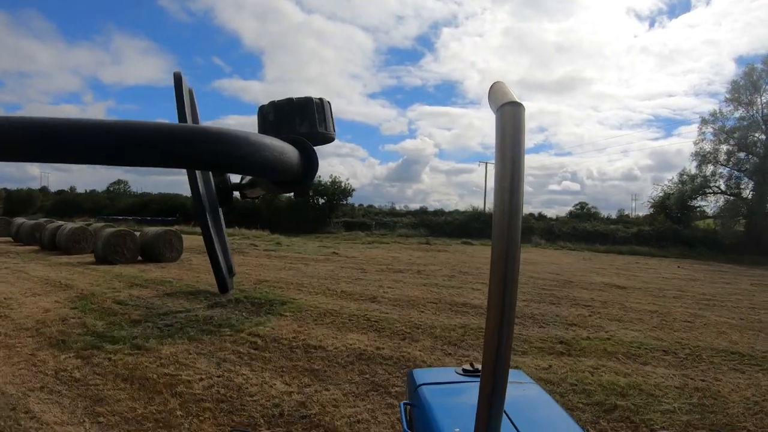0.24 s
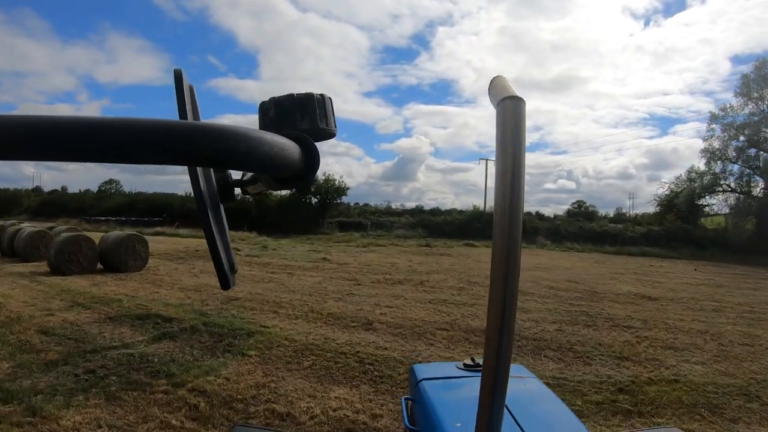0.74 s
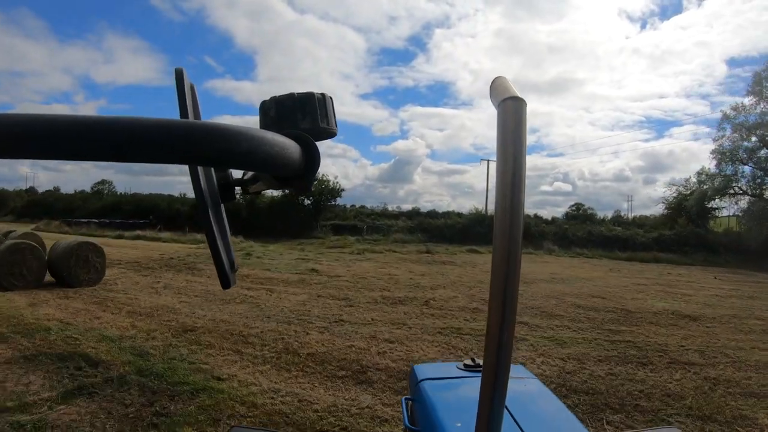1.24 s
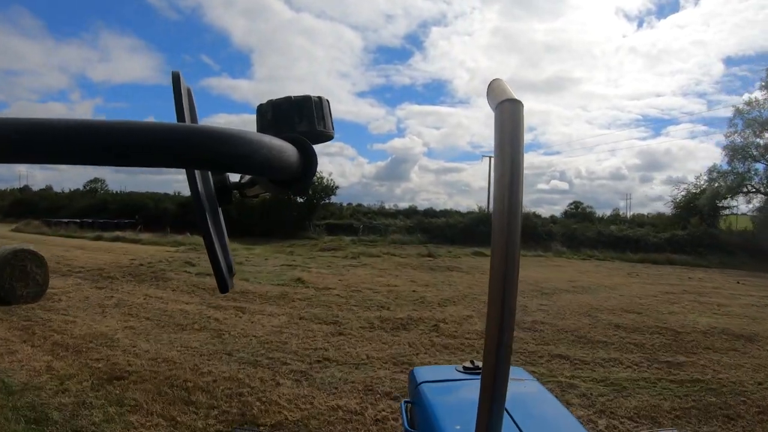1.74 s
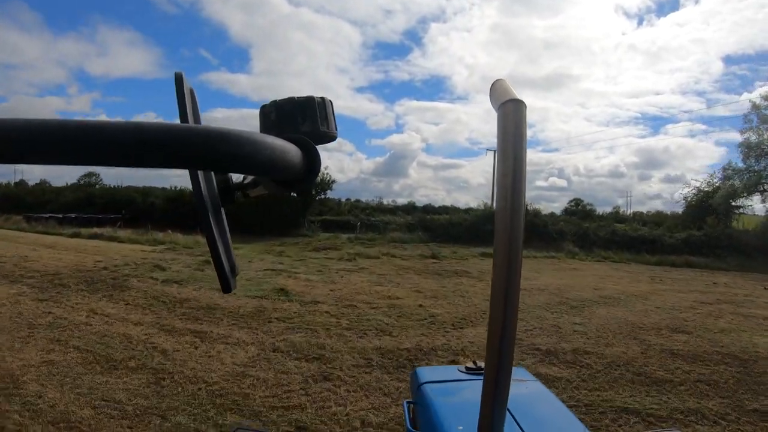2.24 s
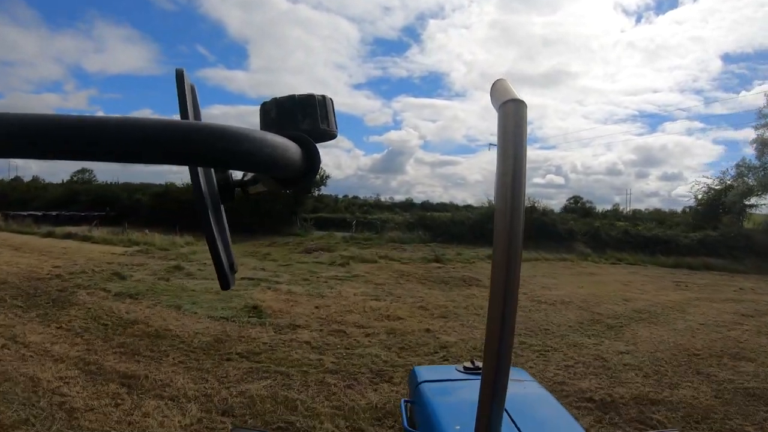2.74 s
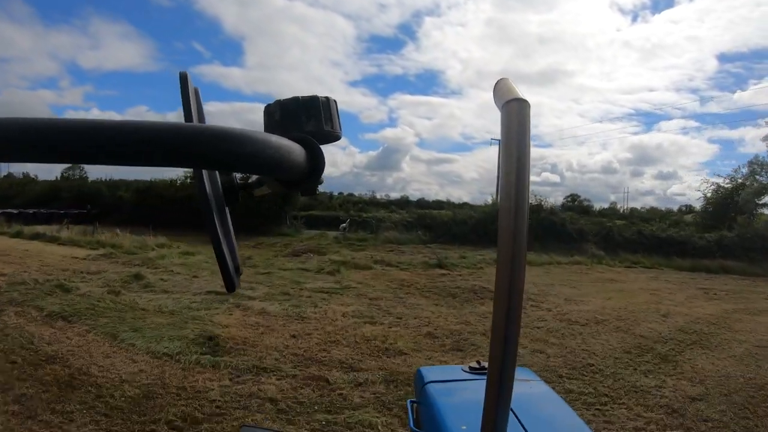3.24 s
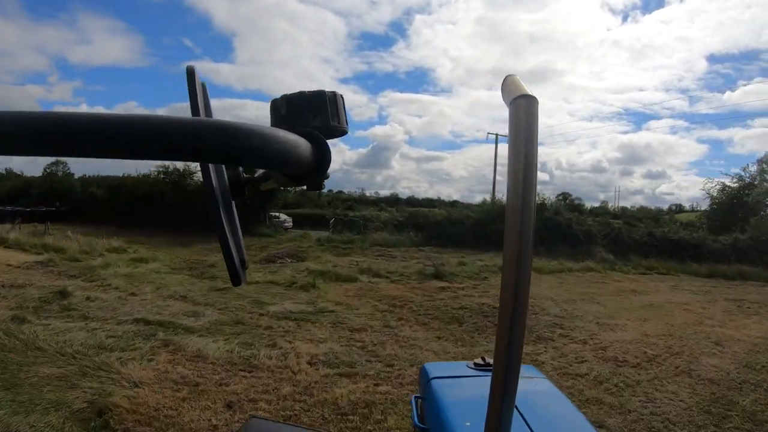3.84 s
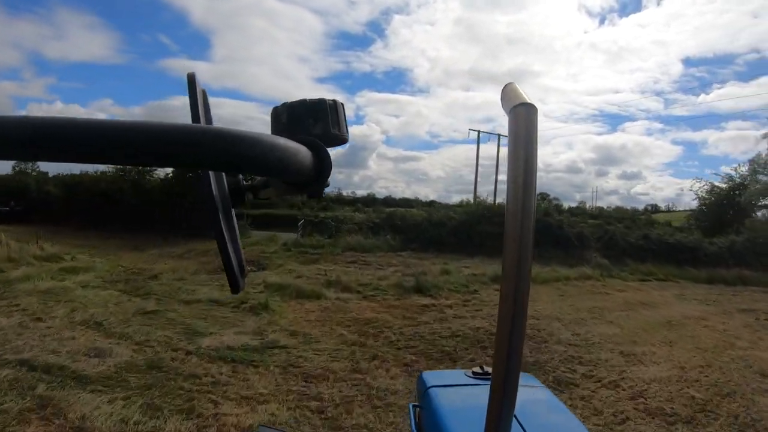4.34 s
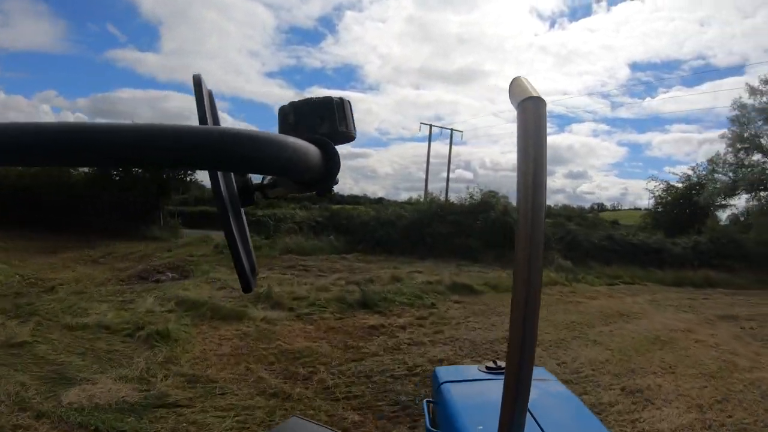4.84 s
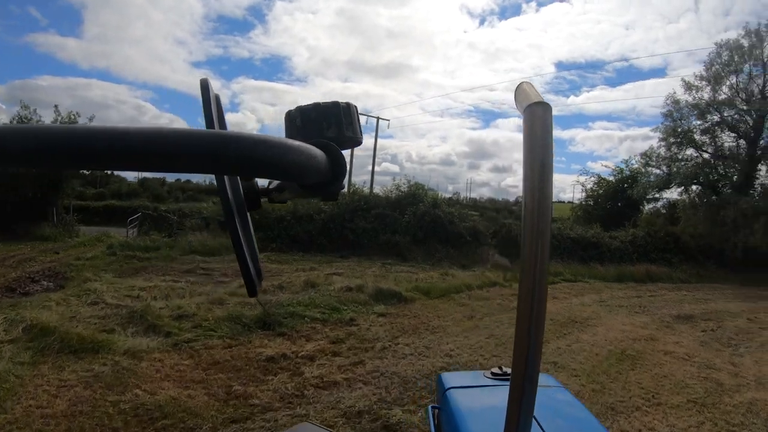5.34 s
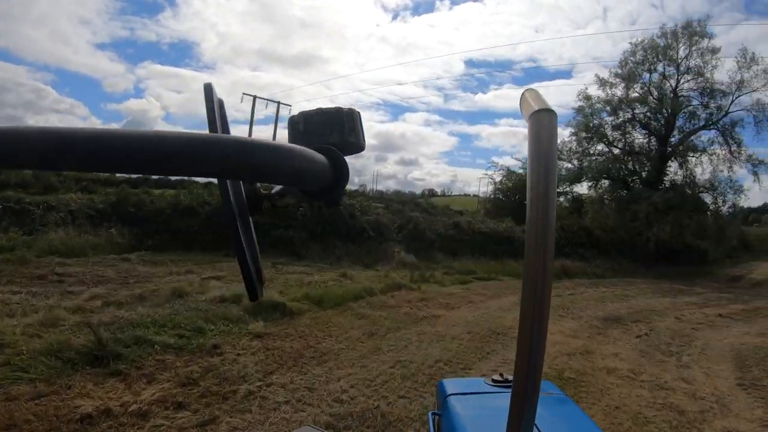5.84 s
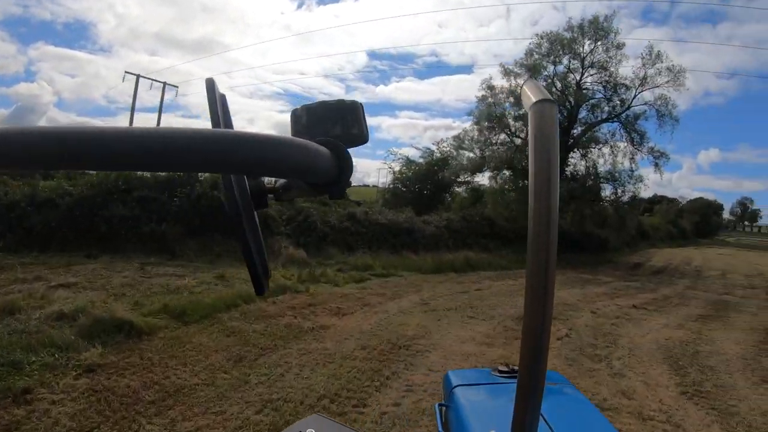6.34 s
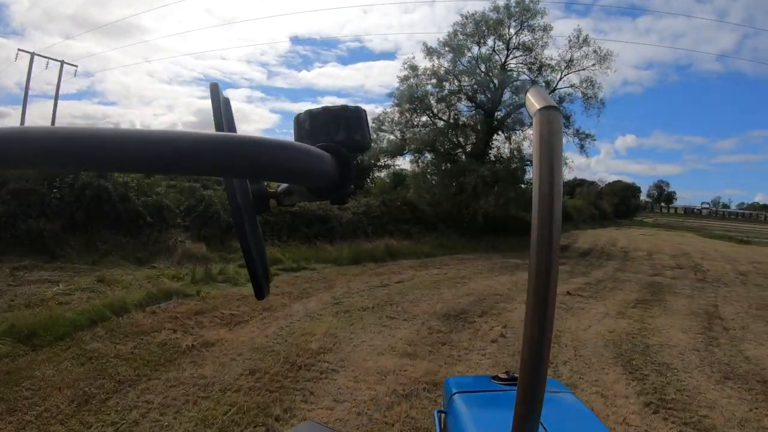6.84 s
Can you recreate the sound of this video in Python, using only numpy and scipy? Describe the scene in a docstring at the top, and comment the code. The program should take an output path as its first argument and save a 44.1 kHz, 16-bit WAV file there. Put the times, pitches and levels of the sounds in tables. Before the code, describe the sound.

A six-cylinder diesel tractor drones loudly in a field, heard from the seat just behind its upright exhaust. The sound starts wide, with a bright hiss on the right, then closes to muffled mono after about 0.7 seconds. The deep exhaust note carries a hollow boom, fast engine knock, faint gear hiss and chassis rumble. Loose fittings clack irregularly on bumps throughout, most clearly around 2.5 seconds, and panels sing faintly between 1 and 2 seconds. The pitch sags slowly under load, dipping more noticeably around 4.3 seconds. At 5.5 seconds the throttle shuts: the drone gets quieter and falls in pitch, breaking into dull chugs over the rumble. A low thud lands near 6.7 seconds, the engine is blipped briefly at 6.8 with harder knocking and rattles, and two more dull thuds follow just after 7 seconds.

```python
"""In a field, on the seat of a six-cylinder diesel tractor, just behind its upright exhaust stack.
The stack drones on the firing rate and its octave; each firing booms in the silencer, puffs from the
pipe and knocks on the block. Gears hiss, the chassis rumbles, fittings clack on bumps, panels sing.
The engine lugs, runs down from 5.5 s with the throttle shut, and is blipped at 6.8 s amid dull thuds.
The sound starts wide, with a bright hiss on the right, then closes to a muffled mono after 0.7 s."""
import sys
import numpy as np
from scipy import signal
from scipy.fft import rfft, irfft
from scipy.io import wavfile

SR = 44100
rng = np.random.default_rng(int(sys.argv[2]) if len(sys.argv) > 2 else 0)


def put_to_file(sound):
    """Save the sound as 16-bit audio at rate SR, in the file named by the first command-line argument."""
    columns = np.atleast_2d(sound).T  # one column per channel
    safe = np.clip(columns, -1, 1)
    whole_steps = np.round(safe * 32767)
    wavfile.write(sys.argv[1], SR, whole_steps.astype(np.int16))


N = 312360
TIME = np.arange(N) / SR
BIN_HZ = np.maximum(np.fft.rfftfreq(N, 1 / SR), 1)
SHUT_AT_S, RUN_DOWN_S = 5.485, 1.0


def from_db(db):
    """Decibels to gain."""
    return 10 ** (np.asarray(db) / 20)


def unit_rms(x):
    """Scale to rms 1."""
    return x / np.sqrt(np.mean(x ** 2) + 1e-20)


def curves(rows):
    """Each column of a timed table, at every sample."""
    times_s, *columns = np.transpose(rows)
    return [np.interp(TIME, times_s, column) for column in columns]


def ramp(start_s, length_s):
    """Linear rise, 0 to 1."""
    return np.clip((TIME - start_s) / length_s, 0, 1)


def drift(rate_hz):
    """Smooth random wander, spread 1."""
    slow = np.convolve(rng.standard_normal(4000), np.hanning(9), "valid")
    return np.interp(TIME * rate_hz * 4, np.arange(len(slow)), unit_rms(slow))


def coloured(x, spectrum):
    """Shape by a spectrum, falling 48 dB per octave past its ends; rms 1."""
    hz, db = np.transpose(spectrum)
    octaves_out = np.abs(np.log2(BIN_HZ / np.clip(BIN_HZ, hz[0], hz[-1])))
    gain = from_db(np.interp(np.log(BIN_HZ), np.log(hz), db) - 48 * octaves_out)
    return unit_rms(irfft(rfft(x) * gain, N))


def resonate(x, modes):
    """Parallel resonances of alternating sign."""
    out = 0
    for k, (hz, width_hz, db) in enumerate(modes):
        radius = np.exp(-np.pi * width_hz / SR)
        forward = np.array([1, 0, -1]) * (1 - radius ** 2) / 2
        feedback = [1, -2 * radius * np.cos(2 * np.pi * hz / SR), radius ** 2]
        out += (-1) ** k * from_db(db) * signal.lfilter(forward, feedback, x + 1e-18)
    return out


def butter(x, hz, kind, order=2):
    """Butterworth filter."""
    return signal.sosfilt(signal.butter(order, hz, kind, fs=SR, output="sos"), x)


def chatter(crank, repeat, steps=2400):
    """Fine impacts; the share `repeat` recurs at the same crank angles every six firings."""
    step = np.floor(crank / 6 * steps).astype(int)
    recurring = rng.standard_normal(steps)[step % steps] * (np.diff(step, prepend=step[0]) > 0)
    return np.sqrt(repeat) * unit_rms(recurring) + np.sqrt(1 - repeat) * rng.standard_normal(N)


def throb(crank, depth_db, lag):
    """One swell per firing, `lag` firings late."""
    return from_db(depth_db * np.cos(2 * np.pi * (crank - lag)))


def blip(lag_s=0, at_s=6.8, attack_s=.06, hold_s=.105, release_s=.085):
    """Short push on the throttle, 0 to 1."""
    start_s = at_s + lag_s
    return ramp(start_s, attack_s) - ramp(start_s + attack_s + hold_s, release_s)


# Engine speed under load (time [s], firing rate [Hz])
PULLING_SPEED = [(0, 98.92), (0.3, 98.95), (0.8, 98.39), (1.2, 97.93), (1.5, 96.79), (1.9, 96.73),
                 (2.1, 93.51), (2.33, 95.51), (2.62, 93.56), (2.8, 94.2), (3.97, 93.72), (4.25, 91.5),
                 (4.42, 85.59), (4.6, 86.74), (4.8, 86.17), (5.25, 83.05), (5.5, 81.81)]

def firing_rate_hz(slows_at_s=5.53, idle_hz=22, blip_adds_hz=21.73):
    """The engine pulls, runs down towards idle with the fuel cut, then gains from the blip."""
    pulling_hz, = curves(PULLING_SPEED)
    momentum = np.exp(-np.maximum(TIME - slows_at_s, 0) / RUN_DOWN_S)
    return idle_hz + (pulling_hz - idle_hz) * momentum + blip_adds_hz * np.cumsum(blip()) / blip().sum()


def lugging_hz():
    """Firing rate lost to the load."""
    pulling_hz, = curves(PULLING_SPEED)
    return pulling_hz.max() - pulling_hz


# Throttle response, part: (pulling [dB], just shut [dB], coasting fade [dB/s], blip [dB])
THROTTLE_RESPONSE = {"chugs": (-50, -27.5, 3, -27), "boom": (-2.5, -30, 1.5, -24),
                     "ring": (-7, -51, -7.5, -38), "knock": (2, -29.5, 0.5, -20),
                     "gears": (-46, -46, 1.1, -38.5), "whir": (-55.5, -46.5, 6, -43),
                     "chassis": (-28.5, -26.5, -4, -19), "flutter": (-24.5, -23.5, 5.5, -36)}
# Late response, part: (lag [s])
THROTTLE_LAG_S = {"boom": .025, "gears": .005, "whir": .02, "chassis": .03, "flutter": .03}

def part_db(part, effort_db=0, shut_takes_s=.11):
    """Level of one part as the throttle is held, shut and blipped."""
    pulling_db, shut_db, fade_db_per_s, blip_db = THROTTLE_RESPONSE[part]
    lag_s = THROTTLE_LAG_S.get(part, 0)
    coast_db = shut_db - fade_db_per_s * np.maximum(TIME - SHUT_AT_S, 0)
    shut, push = ramp(SHUT_AT_S + lag_s, shut_takes_s), blip(lag_s)
    db = (1 - shut) * (pulling_db + effort_db) + shut * coast_db
    return (1 - push) * db + push * blip_db


def wide_share(hold_s=.71, fade_db_per_s=45.5):
    """Share of the wide, bright sound, 1 to 0."""
    return from_db(-fade_db_per_s * np.maximum(TIME - hold_s, 0))


# Exhaust note while coasting (time [s], firing tone [dB], octave [dB])
COASTING_NOTE = [(5.53, -14, -9), (5.555, -23, -36), (5.595, -13, -24), (5.645, -32, -30), (5.69, -19, -23),
                 (5.8, -23, -25), (5.87, -25.5, -25), (6.15, -31.5, -37), (6.35, -36, -46),
                 (6.52, -31, -29.5), (6.75, -35, -36)]

def note_db(tone_db=-15.5, octave_db=-14.5, blip_tone_db=-14.5, blip_octave_db=-24.5):
    """Levels of firing tone and octave: pulling, coasting, blipped."""
    pulling = tone_db - .9 * wide_share(), octave_db - .1269 * lugging_hz()
    shut, push = ramp(COASTING_NOTE[0][0], .02), blip(lag_s=.038)
    states = zip(pulling, curves(COASTING_NOTE), (blip_tone_db, blip_octave_db))
    return [(1 - push) * ((1 - shut) * pull_db + shut * coast_db) + push * blip_db
            for pull_db, coast_db, blip_db in states]


# Weak exhaust lines (order [x cycle rate], level re boom [dB], change with lugging [dB/Hz])
UNEVEN_ORDERS = [(10, -5.5, .1), (14, -.5, .4), (16, -10, -.1), (18, -1.5, -1.8), (20, -.5, -.6),
                 (22, -13, .6), (24, -13, -.1), (26, -9.5, -.7), (28, -7.5, -.4)]

def drone(crank, boom_db, loaded_db=-17, octave_lag_rad=1.8):
    """The stack's note: firing tone, octave and the weak lines of unequal cylinders."""
    tone_db, octave_db = note_db()
    phase = 2 * np.pi * crank
    out = from_db(tone_db + .1 * drift(6.2)) * np.cos(phase)
    out += from_db(octave_db + .5 * drift(20)) * np.cos(2 * phase - octave_lag_rad)
    lines_db = boom_db + np.minimum(octave_db - loaded_db, 0)  # they die when the fuel is cut
    for order, db, lug_db_per_hz in UNEVEN_ORDERS:
        gain = from_db(lines_db + db + lug_db_per_hz * lugging_hz() + .43 * drift(1))
        out += gain * np.cos(order * phase / 6 + 2 * np.pi * rng.random() + .34 * drift(3.2))
    return np.sqrt(2) * out


# Chassis shake (frequency [Hz], relative density [dB])
CHASSIS_SPECTRUM = [(15, -23.5), (30, -4), (50, 1.5), (85, 3), (130, -3), (200, -2.5), (250, -4), (350, -9),
                    (600, -35)]
# Exhaust flutter (frequency [Hz], relative density [dB])
FLUTTER_SPECTRUM = [(56, -17.5), (85, -6.5), (130, -0.5), (200, -6), (240, -6.5), (290, -38)]

def rumble(stubble_db=-7.5):
    """The chassis shakes and the exhaust flutters, more as smooth stubble gives way to rough grass."""
    ground_db = stubble_db * (1 - ramp(start_s=.43, length_s=1.5))
    chassis_db = part_db("chassis", ground_db) + 1.9 * drift(6)
    chassis = from_db(chassis_db) * coloured(rng.standard_normal(N), CHASSIS_SPECTRUM)
    flutter = from_db(part_db("flutter", ground_db)) * coloured(rng.standard_normal(N), FLUTTER_SPECTRUM)
    return chassis + flutter


# Stack pipe response (frequency [Hz], relative gain [dB])
PIPE_SPECTRUM = [(600, -20), (650, -14), (672, -2), (703, 2), (738, 0), (765, -8), (850, -20), (950, -24),
                 (1045, -22), (1078, -6.5), (1110, -20), (1148, -14), (1174, -2), (1200, -14), (1225, -13),
                 (1320, -30)]

def bark(crank, rate_hz, lag_firings=2.35, even_db=-5, rings_on_hz=1000):
    """The strongest cylinder rings the stack once a cycle; its opposite answers more weakly."""
    hz, db = np.transpose(PIPE_SPECTRUM)
    phase = 2 * np.pi * (crank - lag_firings + .006 * drift(12)) / 6
    out = 0
    for order in range(38, 92):
        line_hz = order * rate_hz / 6
        gain = from_db(np.interp(line_hz, hz, db, left=-60, right=-60) + even_db * (order % 2 == 0))
        # high lines ring on between barks as steady overtones
        scatter = 2 * np.pi * rng.random() * (np.median(line_hz) > rings_on_hz)
        out += gain * np.cos(order * phase + scatter)
    return unit_rms(out) * from_db(.5 * drift(25))


# Silencer boom (frequency [Hz], relative density [dB])
BOOM_SPECTRUM = [(180, -26), (250, -5.5), (315, -2), (370, -5.5), (435, 2), (500, -5), (620, -9.5),
                 (720, -21), (900, -43.5)]

def boom(crank):
    """Each firing booms in the silencer."""
    return coloured(chatter(crank, repeat=.37) * throb(crank, depth_db=3.2, lag=.17), BOOM_SPECTRUM)


# Cylinders in firing order (relative strength [dB])
CYLINDER_STRENGTH_DB = [-1.5, -4.5, 4, -4.5, -2.5, 1]

def puffs(crank, lag_firings=.35):
    """Turbulent gas follows each pulse down the pipe."""
    strength = from_db(np.interp(crank - lag_firings, np.arange(6), CYLINDER_STRENGTH_DB, period=6))
    return unit_rms(coloured(rng.standard_normal(N), PIPE_SPECTRUM) * strength)


# Engine block (frequency [Hz], relative density [dB])
BLOCK_SPECTRUM = [(600, -3.5), (740, 4), (860, -0.5), (980, -1.5), (1150, 0), (1300, -5.5), (1520, -7),
                  (1720, -5), (1870, -6), (2050, -7), (2300, -11.5), (2580, -13), (2750, -19.5),
                  (2950, -22.5)]
# Bonnet panels (frequency [Hz], width [Hz], gain [dB])
BONNET_MODES = [(1667, 80, 1), (1795, 35, 4), (2020, 40, -2.5), (2420, 24, -1), (2547, 11, 2),
                (2726, 31, -5.5)]

def knock(crank, boom_db):
    """Combustion shakes block and bonnet unevenly; the panels ring more when the silencer booms."""
    swing_db = -1 + 1.5 * ramp(SHUT_AT_S, RUN_DOWN_S)
    force = throb(crank, swing_db, lag=.17) * from_db(.88 * drift(70))
    block = coloured(chatter(crank, repeat=.33) * force, BLOCK_SPECTRUM)
    panels = resonate(chatter(crank, repeat=.71) * force, BONNET_MODES)
    panel_db = -10 + .73 * (boom_db - boom_db.mean())
    return block + from_db(panel_db) * unit_rms(butter(panels, [1400, 2900], "band"))


# Clatter trim, first row held while pulling (time [s], boom and puffs [dB], knock [dB])
CLATTER_TRIM = [(5.5, 0.5, 1), (5.6, 0.5, -2.5), (5.85, 1, 0), (6.1, -1.5, 1), (6.27, 4.5, 0.5),
                (6.42, 0.5, 0.5), (6.48, -0.5, -3.5), (6.55, -1, 0), (6.65, 1, -2), (6.8, -0.5, -0.5),
                (6.86, 0.5, -1.5)]

def clatter(crank, boom_db, ring_db, knock_db, puff_re_ring_db=-12):
    """Boom, puff and knock of the firings; their balance wavers while coasting."""
    low_db, high_db = curves(CLATTER_TRIM)
    return (from_db(boom_db + low_db) * boom(crank)
            + from_db(ring_db + low_db + puff_re_ring_db) * puffs(crank)
            + from_db(knock_db + high_db) * knock(crank, boom_db + low_db))


# Timing gears and injectors (frequency [Hz], relative density [dB])
GEAR_SPECTRUM = [(2600, -2), (2900, -8), (3200, 0.5), (3650, 2), (3950, -6), (4300, -3), (4850, -5),
                 (5150, -10), (5600, -15.5), (7300, -21.5), (8200, -35.5), (9500, -36), (11000, -51)]

def gears(crank, width):
    """Timing gears and injectors hiss, pulsing lightly with the firings."""
    teeth = chatter(crank, repeat=.1) * throb(crank, depth_db=1.5, lag=.021) * from_db(1.1 * drift(60))
    return from_db(part_db("gears", -1.5 * width)) * coloured(teeth, GEAR_SPECTRUM)


# Transmission casing (frequency [Hz], width [Hz], gain [dB])
CASING_MODES = [(4320, 200, 2), (4720, 220, -2)]

def whir(lug_db_per_hz=.345):
    """The transmission whirs in its casing, louder as the engine lugs."""
    casing = resonate(rng.standard_normal(N) * from_db(1.5 * drift(50)), CASING_MODES)
    level_db = part_db("whir", lug_db_per_hz * lugging_hz())
    return from_db(level_db) * unit_rms(butter(casing, [4000, 5000], "band"))


# Exhaust jet (frequency [Hz], relative density [dB])
JET_SPECTRUM = [(2800, -5.5), (4500, -4.5), (5700, 0), (7500, -4.5), (9000, -5), (10500, -10.5),
                (12000, -18), (13700, -25)]

def jet(crank, width, level_db=-34):
    """The exhaust jet hisses on the right, lingering as the width closes."""
    gas = rng.standard_normal(N) * throb(crank, depth_db=1.5, lag=.12) * from_db(1.3 * drift(40))
    return np.array([np.zeros(N), from_db(level_db) * width ** .75 * coloured(gas, JET_SPECTRUM)])


# Faint high hiss (frequency [Hz], relative density [dB])
HIGH_HISS_SPECTRUM = [(9000, -10), (11000, -8.5), (12500, 3), (14000, -5.5)]

def high_hiss(crank, re_octave_db=-58):
    """Very faint hiss near 12 kHz that fades with the exhaust note."""
    _, octave_db = note_db()
    noise = rng.standard_normal(N) * throb(crank, depth_db=1, lag=.1)
    return from_db(octave_db + re_octave_db) * coloured(noise, HIGH_HISS_SPECTRUM)


# Fitting strikes (time [s], peak before panning [dB])
FITTING_HITS = [(0.144, -17.5), (0.456, -17.5), (0.557, -20), (0.652, -21), (1.583, -17), (1.849, -18),
                (2.424, -14), (2.573, -12), (3.127, -19), (3.733, -16), (4.06, -18), (4.159, -19),
                (4.454, -19), (4.944, -17), (5.903, -21), (6.69, -21), (6.76, -21), (6.817, -17),
                (6.844, -18), (6.858, -15), (7.039, -17), (7.057, -17.5)]
# Loose fittings (frequency [Hz], width [Hz], gain [dB])
CLACK_MODES = [(760, 120, 13.5), (1270, 540, 7.5), (1690, 700, 6.5), (2630, 520, 0.5), (3460, 1700, -10)]

def clacks(width, crack_s=.0045, tail_s=.016, tail_gain=.34, left_bias_db=7.5):
    """Loose fittings strike on bumps: a sharp crack and a short tail, to the left while wide."""
    out = np.zeros(N + SR)
    age_s = np.arange(SR // 10) / SR
    envelope = np.exp(-age_s / crack_s) + tail_gain * np.exp(-age_s / tail_s)
    for at_s, db in FITTING_HITS:
        contact = rng.choice([-1, 1], len(age_s)) * envelope
        hit = butter(resonate(contact, CLACK_MODES), [550, 3600], "band", order=4)
        start = int(at_s * SR)
        out[start:start + len(hit)] += from_db(db) * hit / np.abs(hit).max()
    return out[:N] * from_db(left_bias_db * np.array([width, -width]) / 2)


# Brief squeaks (time [s], length [s], frequency [Hz], level [dB])
SQUEAK_TONES = [(0.2, 0.035, 5200, -46), (4.355, 0.03, 4480, -49), (4.382, 0.022, 4260, -46),
                (6.74, 0.11, 4850, -55)]
# Loose panels in resonance with the engine (time [s], length [s], frequency [Hz], level [dB])
LOOSE_PANEL_TONES = [(1.1, 0.3, 2530, -43), (1.48, 0.22, 2528, -43), (1.22, 0.7, 1788, -40)]

def singing(tones, waver_hz, flicker_db):
    """Squeaks or singing panels: thin wavering tones that swell and die."""
    out = 0
    for at_s, length_s, hz, db in tones:
        swell = np.sqrt(np.abs(np.sin(np.pi * ramp(at_s, length_s))))
        phase = 2 * np.pi * np.cumsum(hz + waver_hz * drift(120)) / SR
        out += np.sqrt(2) * swell * from_db(db + flicker_db * drift(35)) * np.sin(phase)
    return out


# Low thuds (time [s], peak [dB])
LOW_THUDS = [(5.128, -21), (6.69, -11.5), (7.056, -7.5), (7.073, -9)]
# Thud resonances (frequency [Hz], width [Hz], gain [dB])
LOW_THUD_MODES = [(106, 64, -2), (222, 65, -1.2), (300, 120, 0.98), (424, 80, 1)]

def thuds(pulse_s=.0016):
    """Dull low thuds, the loudest as the engine note surges after the blip."""
    out = np.zeros(N + SR)
    age_s = np.arange(SR // 10) / SR
    thud = butter(resonate(np.exp(-age_s / pulse_s), LOW_THUD_MODES), 710, "low")
    for at_s, db in LOW_THUDS:
        start = int(at_s * SR)
        out[start:start + len(thud)] += from_db(db) * thud / np.abs(thud).max()
    return out[:N]


# Low silencer resonances (frequency [Hz], width [Hz], gain [dB])
CHUG_MODES = [(104, 48, -2.5), (166, 48, 2), (223, 38, -2.5), (310, 50, -5)]

def chugs(crank):
    """With the fuel cut the strokes come apart, each a dull thud in the silencer."""
    firing = np.floor(crank + .2 + .017 * drift(60)).astype(int)
    strength = from_db(np.array(CYLINDER_STRENGTH_DB)[firing % 6] + rng.standard_normal(N))
    pulses = unit_rms((np.diff(firing, prepend=firing[0]) > 0) * strength)
    silencer = butter(resonate(pulses, CHUG_MODES), [60, 450], "band")
    return from_db(part_db("chugs")) * unit_rms(silencer)


def rev_knock(crank, rate_hz, gain_db=-17, decay_s=.0043):
    """Fuel thrown into the slow engine burns at once: a hard crack per firing of the blip."""
    age_s = (crank - .3) % 1 / rate_hz
    cracks = rng.standard_normal(N) * np.exp(-age_s / decay_s)
    return from_db(gain_db) * blip() * np.std(cracks) * coloured(cracks, BLOCK_SPECTRUM)


def spread(hum, near, far, split_hz=600):
    """Wide stereo: bass in phase, the near clatter's upper band opposed, the far clatter on the left."""
    low, high = butter(near, split_hz, "low"), butter(near, split_hz, "high")
    left = from_db(-2.5) * hum + from_db(3) * low + from_db(3.5) * high + from_db(-1.5) * far
    right = from_db(.86) * hum + from_db(-12) * low - from_db(11.5) * high
    return np.array([left, right])


# Engine effort, added to the pulling levels (time [s], boom [dB], pipe ring [dB], knock [dB])
PULLING_EFFORT = [(0, -31, -39, -35), (0.699, -31.5, -42, -35.5), (0.999, -25.5, -27, -34),
                  (1.55, -25, -34.5, -32.0), (2.3, -28, -27, -33), (3.5, -30.5, -25.5, -30.5),
                  (3.9, -27.5, -28, -33), (4.25, -27.5, -27, -32.5), (4.38, -27.5, -29, -34),
                  (4.6, -29.5, -26.5, -31), (4.95, -28, -26, -28), (5.151, -25, -28, -29),
                  (5.38, -29.5, -28, -28), (5.5, -29.5, -37, -30)]

def scene():
    """Engine, chassis and bodywork: wide at first, then centred."""
    rate_hz = firing_rate_hz()
    crank = np.cumsum(rate_hz) / SR  # in firings, six per cycle
    width = wide_share()
    boom_db, ring_db, knock_db = map(part_db, ("boom", "ring", "knock"), curves(PULLING_EFFORT))
    hum = drone(crank, boom_db) + rumble() + chugs(crank)
    stack = from_db(ring_db + 2.5) * bark(crank, rate_hz)
    near, far = [stack + clatter(crank, boom_db, ring_db, knock_db) + gears(crank, width) + whir()
                 for _ in range(2)]
    centred = (1 - width) * hum + np.sqrt(1 - width ** 2) * far + rev_knock(crank, rate_hz) + thuds()
    panels = singing(LOOSE_PANEL_TONES, waver_hz=6, flicker_db=-2.5)
    squeaks = singing(SQUEAK_TONES, waver_hz=91, flicker_db=2)
    bodywork = panels + squeaks + clacks(width)
    return width * spread(hum, near, far) + jet(crank, width) + centred + high_hiss(crank) + bodywork


def record(dry):
    """Steep treble cut, 70 dB down from 15.7 kHz."""
    return signal.sosfilt(signal.cheby2(12, 70, 15700, fs=SR, output="sos"), dry)


dry = scene()
out = record(dry)
put_to_file(out)
```